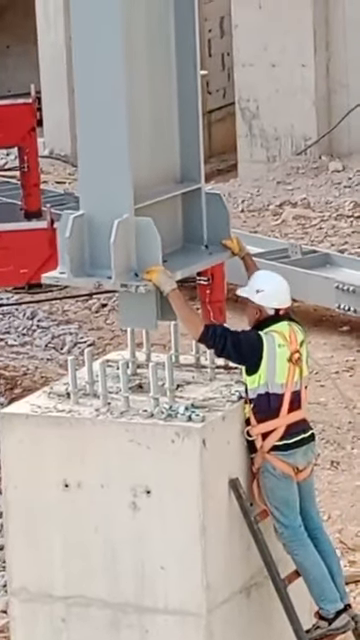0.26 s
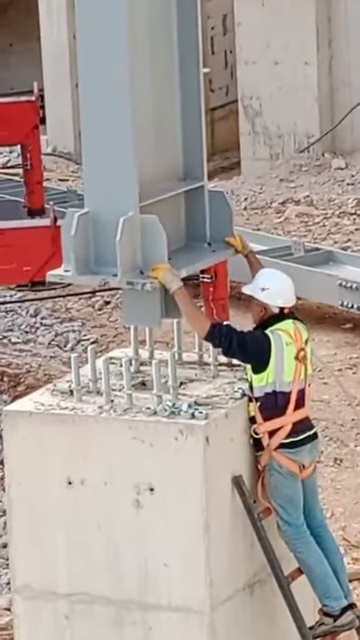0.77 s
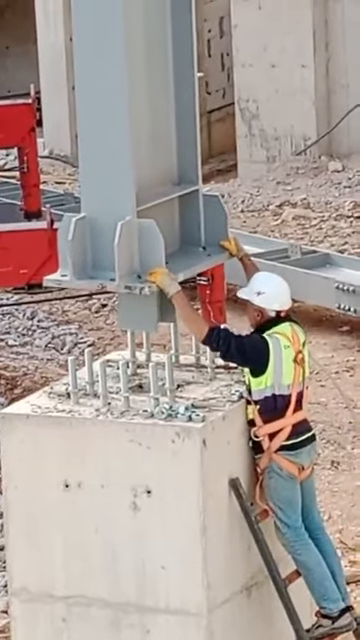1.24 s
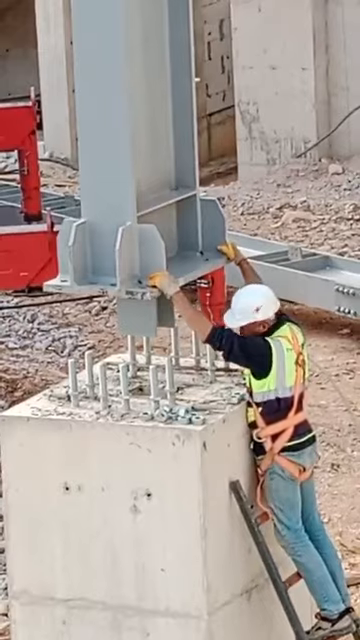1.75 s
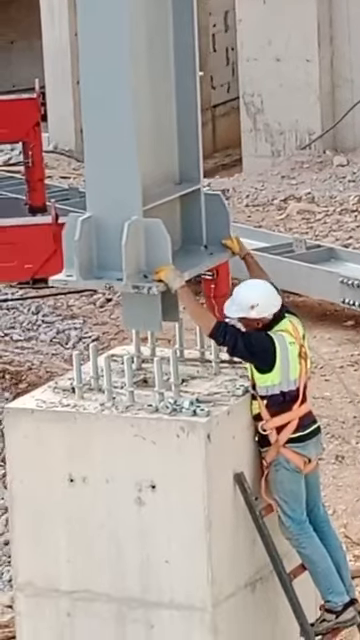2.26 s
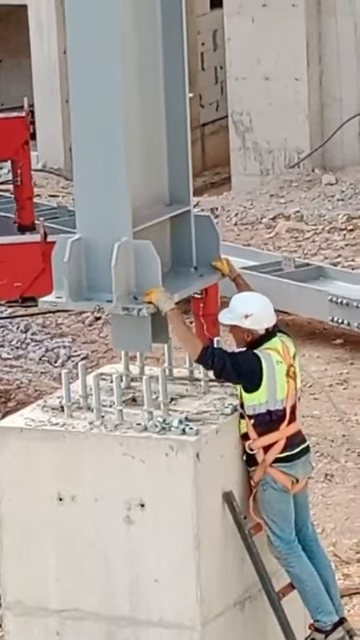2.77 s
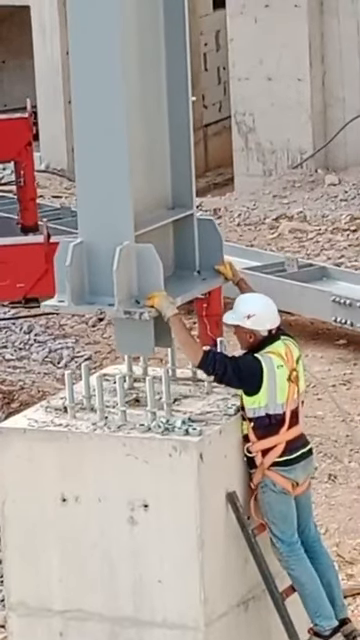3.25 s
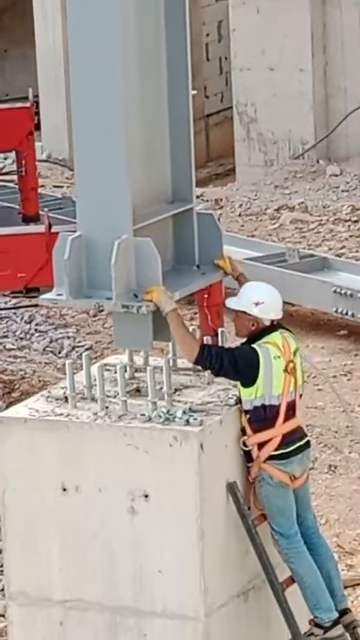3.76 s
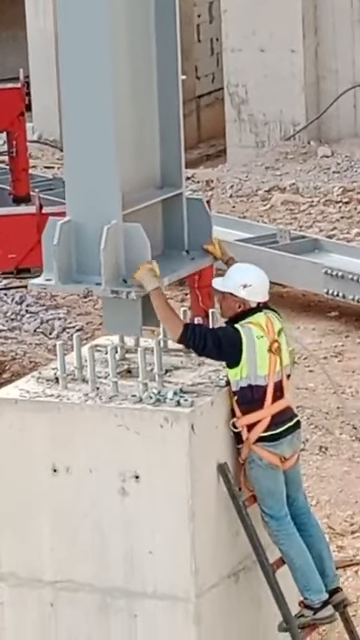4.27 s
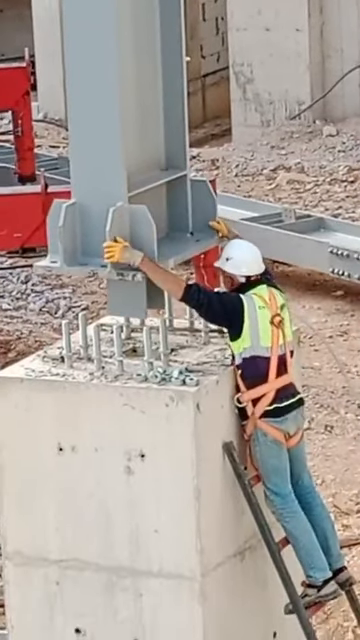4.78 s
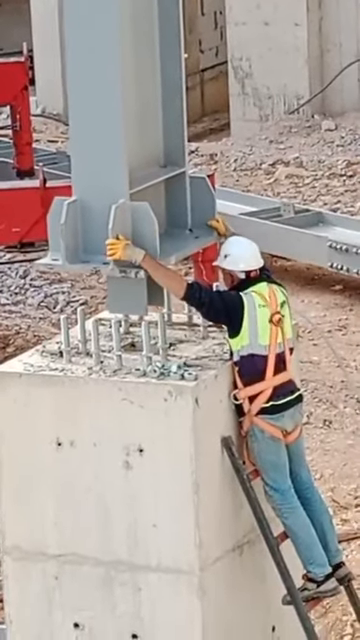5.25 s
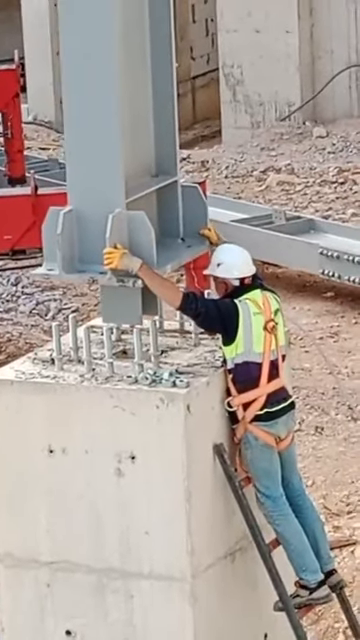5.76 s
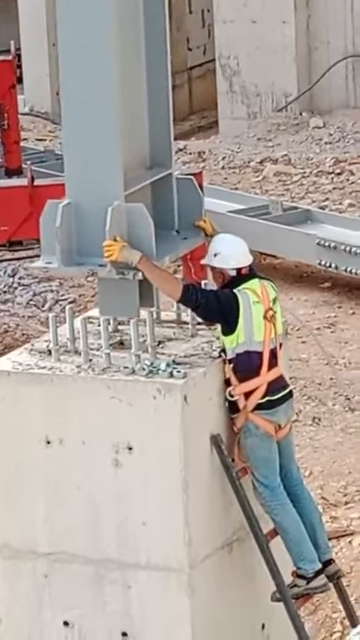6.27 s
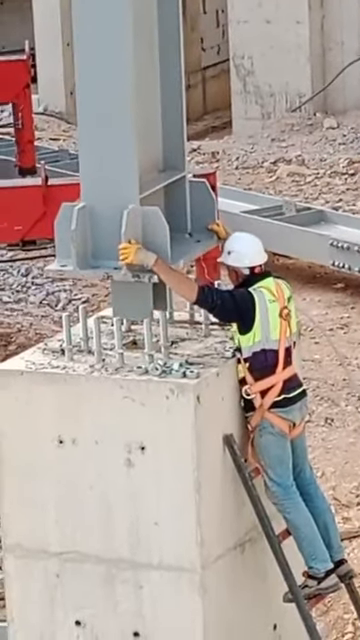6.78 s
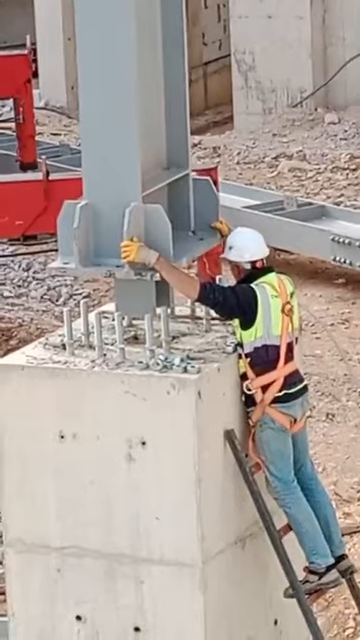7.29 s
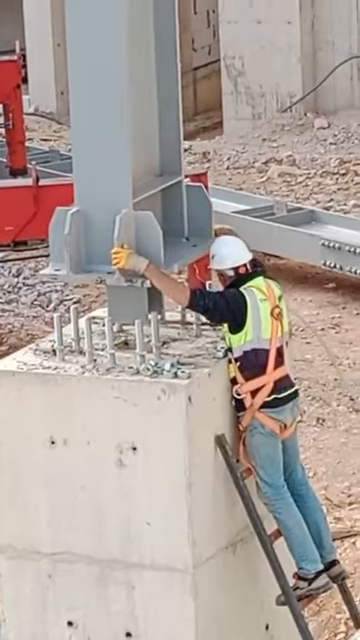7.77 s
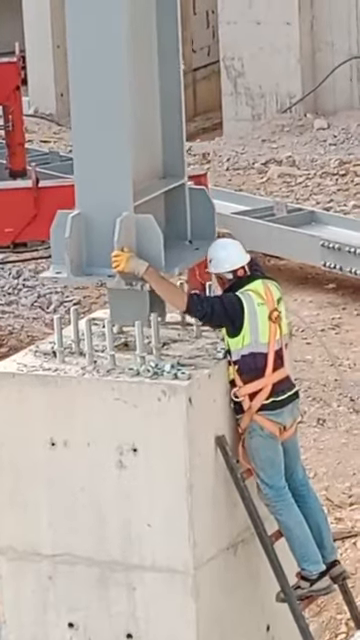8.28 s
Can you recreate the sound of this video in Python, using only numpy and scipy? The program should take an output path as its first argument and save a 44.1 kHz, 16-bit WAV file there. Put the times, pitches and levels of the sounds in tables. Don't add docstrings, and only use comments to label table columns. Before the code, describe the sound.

An outdoor building site heard through a distant phone microphone, mono, grainy and dull on top, with low wind buffeting. At 0 s a heavy diesel's drone falls in pitch, fading by 0.7 s into rough idling, broad machinery rumble and fan hiss. Dull knocks come near 0.85 and 1.45 s; at about 2.3 s steel clanks sharply, with smaller knocks until 3 s and short concrete echoes. At 3.1 s compressed air bursts out in a brief, fast-fading hiss. From 4.1 s the engine revs up rapidly, peaking around 4.8 s as a strong low growl with louder roar and hiss, loose parts rattling. A hydraulic moan swells around 5.2 s and fades before 7 s. The engine sags near 6 s, pulls again, with a knock at 6.4 s, dips around 7.2 s, recovers slightly, then drops away by 8.2 s with a last thud, leaving idle rumble until 8.5 s.

```python
import sys
import numpy as np
from scipy import signal
from scipy.fft import rfft, irfft, next_fast_len
from scipy.io import wavfile
from scipy.ndimage import uniform_filter1d

SR = 44100
rng = np.random.default_rng(int(sys.argv[2]) if len(sys.argv) > 2 else 0)


def persist_wave(psi):
    counts = np.round(np.clip(psi, -1, 1) * 32767).astype(np.int16)
    wavfile.write(sys.argv[1], SR, np.atleast_2d(counts).T)


def boost(x):
    u = np.asarray(x, float) / 20
    return 10 ** u


N = 376155
T = np.arange(N) / SR


def evened(x):
    return x / np.sqrt(np.mean(x ** 2) + 1e-20)


def columns(rows, outside=None):
    s, *values = np.transpose(rows)
    return [np.interp(T, s, v, outside, outside) for v in values]


def add(mix, s, sound):
    part = mix[round(s * SR):][:len(sound)]
    part += sound[:len(part)]


def white(n=N):
    return rng.standard_normal(n)


def coloured(x, points):
    size = next_fast_len(len(x))
    f, db = np.transpose(points)
    hz = np.fft.rfftfreq(size, 1 / SR)
    shape = boost(np.interp(np.log(hz + 1), np.log(f + 1), db, -120, -120))
    return evened(irfft(rfft(x, size) * shape, size)[:len(x)])


def patchy(patch_db, bins, frames):
    a, b, patches = rng.standard_normal((N // 128 + 5, 257, 3)).T
    patches = uniform_filter1d(patches, bins, 0)
    patches = evened(uniform_filter1d(patches, frames, 1))
    spectrum = (a + 1j * b) * boost(patch_db * patches)
    return signal.istft(spectrum, nperseg=512, noverlap=384)[1][:N]


def wander(rate_hz):
    low_pass = signal.butter(2, rate_hz, fs=SR / 32, output="sos")
    coarse = evened(signal.sosfilt(low_pass, white(N // 32 + 2)))
    return np.interp(np.arange(N) / 32, np.arange(len(coarse)), coarse)


def resonate(x, hz, width_hz):
    turn = np.exp(2j * np.pi * np.cumsum(hz * np.ones(len(x))) / SR)
    r = np.exp(-np.pi * width_hz / SR)
    once = signal.lfilter([1 - r], [1, -r], x / turn)
    twice = signal.lfilter([1 - r], [1, -r], once)
    return (turn * twice).real


# [t/s, firing rate f/Hz, exhaust load/dB, silencer's effect on second beat/dB]
COAST = [
    (0, 71.8, -41, -3),
    (.1, 67.06, -25.5, -3),
    (.25, 57.9, -32, -1),
    (.4, 56.8, -23.5, -3),
    (.56, 50.7, -33, 3),
    (.68, 52.6, -58, -1),
]
# [t/s, firing rate f/Hz, exhaust load/dB, silencer's effect on second beat/dB]
PULL = [(4.08, 40.25, -58, -1), (4.3, 50.34, -30.5, -4), (4.46, 61.2, -26, -7), (4.62, 65.04, -29, -11),
        (4.8, 67.25, -28.5, -5), (4.92, 67.1, -29.5, 5.5), (5.07, 66.93, -27, 5.5),
        (5.16, 66.33, -26, -7.5), (5.5, 64.16, -27.5, -2), (6.0, 56.44, -27.5, -1), (6.75, 58.33, -26, -4),
        (7.0, 58.64, -32, 1), (7.15, 59.1, -41, -1), (7.35, 62.3, -40.5, -4), (7.53, 59.06, -34.5, 4),
        (7.79, 54.73, -29.5, 1.5), (8.03, 54.2, -35.5, 3), (8.16, 49.7, -72, 1)]
# [multiple of firing rate, level/dB]
UPPER_BEATS = [(1.5, -7.5), (2.5, -8.5), (3, 4), (3.5, -9.5), (4, 6), (4.5, -5.5), (5, -0.5), (6, -7.5),
               (7, -2.5), (8, -10.5), (9, -7.5)]
# [f/Hz, gain/dB]
PIPE = [(30, 7.5), (170, -4.5), (200, -1.5), (240, -2), (268, 0.5), (300, -0.5), (335, 9.5), (400, -11.5),
        (470, -3), (600, -8.5)]


def exhaust(rows, first_beat_db, second_beat_db, upper_beats_db):
    on = (T > rows[0][0]) & (T < rows[-1][0])
    hz, load_db, hold_db = (curve[on] for curve in columns(rows))
    first_db = load_db + first_beat_db
    second_db = load_db + second_beat_db + hold_db
    upper_db = load_db + upper_beats_db + (1 - 0.51) * np.clip(-30 - load_db, 0, 14)
    phase = 2 * np.pi * np.cumsum(hz) / SR
    beats = boost(first_db + 1.1 * wander(18.0)[on]) * np.sin(phase)
    beats += boost(second_db + 1.7 * wander(1.6)[on]) * np.sin(2 * phase)
    for k, db in UPPER_BEATS:
        pipe_db = np.interp(k * hz, *np.transpose(PIPE))
        level = boost(upper_db + db + pipe_db + 0.33 * wander(3.6)[on])
        beats += level * np.sin(k * phase + 2 * np.pi * rng.random())
    out = np.zeros(N)
    onset_s = 0.0043
    out[on] = np.sqrt(2) * beats * np.clip(T[:len(hz)] / onset_s, 0, 1)
    return out


CYLINDERS = [0.5, -16, -19, 5.5, 2.5, 9]
# [t/s, effort/dB, fan air against effort/dB]
WORK = [(0.0, -29, -9.5), (0.52, -28.5, -11.5), (0.8, -29.5, -11), (1.04, -27.5, -16.5), (1.69, -29, -12),
        (2.18, -34, -9.5), (2.68, -29, -9.5), (2.8, -35, -12), (3.05, -34.5, -20), (3.3, -30.5, -11),
        (3.66, -32.5, -16.5), (4.0, -30, -14), (4.42, -23.5, -10.5), (4.77, -23, -11), (6.29, -27, -12),
        (6.75, -26, -12.5), (7.85, -27.5, -13.5), (8.3, -32.5, -12.5)]
# [t/s, share of its din in the middle sound/0-1]
BUSY = [(0, 0.64), (.8, 0.73), (1.05, 0.94), (1.7, 0.79), (2.1, 0.26), (2.7, 0.44), (3.5, 0.43),
        (3.75, 0.13), (4.05, 0.02), (4.6, 0.05), (5.5, 0), (6.3, 0.2), (7.0, 0.07), (7.9, 0.13),
        (8.53, 0.3)]
# [f/Hz, density/dB per Hz]
BOOM = [(90, -23), (150, 0), (204, 3.5), (281, 6), (320, 3.5), (400, 1.5), (450, -1.5), (520, -15.5),
        (700, -53.5)]
# [f/Hz, density/dB per Hz]
ROAR = [(400, -44), (520, -14.5), (640, -3), (740, 0.5), (830, 1.5), (947, 2), (1060, 3.5), (1300, 4),
        (1400, -1.5), (1480, -10.5), (1630, -5.5), (1800, -15.5), (2100, -34.5), (2700, -48)]
# [f/Hz, density/dB per Hz]
DIN = [(260, -35), (440, 0), (618, -3.5), (719, -3), (879, -9.5), (949, -2), (1110, -5.5), (1460, -10),
       (1600, -7), (1760, -11.5), (2300, -21), (2990, -47.5), (5060, -120)]
# [f/Hz, density/dB per Hz]
HISS = [(1120, -16.5), (1900, -2), (2080, -4), (2370, 2.5), (2860, 1.5), (3330, -6), (4410, -9),
        (4740, -14), (5400, -11), (5900, -21), (6600, -26.5), (8000, -45.5), (9500, -53), (15600, -56)]
IDLE_DB = -30
FAN_REST_DB = -44


def block():
    rate_hz = columns([row[:2] for row in COAST + PULL])[0]
    firings = np.cumsum(rate_hz) / SR
    strength = boost(np.array(CYLINDERS)[firings.astype(int) % len(CYLINDERS)])
    puff = strength * np.exp(-(firings % 1) / 0.11)
    valve = np.exp(-(firings % len(CYLINDERS)) / 1.5)
    effort_db, air_db = columns(WORK)
    share = np.clip(columns(BUSY)[0], 0, 1)
    boom_db = -33 + 5.5 * (np.sqrt(share) - .5)
    boom_db += 0.79 * (effort_db - IDLE_DB) + 1.25 * wander(3.0)
    jerks = boost(0.5 * wander(41.0))
    boom = coloured(patchy(3.3, bins=2, frames=12) * jerks, BOOM)
    roar = coloured(patchy(0.26, bins=2, frames=30) * (1 + 0.063 * puff) * jerks, ROAR)
    din = coloured(patchy(3.17, bins=3, frames=15) * jerks, DIN)
    hiss = coloured(patchy(1.5, bins=8, frames=20) * (1 + 0.25 * puff + 0.42 * valve), HISS)
    middle = np.sqrt(1 - share) * roar + np.sqrt(share) * din
    return boost(boom_db) * boom + boost(effort_db) * middle + boost(effort_db + air_db) * hiss


# [f/Hz, width/Hz, level against hiss/dB]
FIZZ = [(7910, 1100, -45), (12350, 600, -50), (14600, 800, -49.5)]


def fan_fizz():
    bands = sum(boost(db) * evened(resonate(white(), hz, width)) for hz, width, db in FIZZ)
    fan_db = sum(columns(WORK))
    return bands * boost(FAN_REST_DB + 0.6 * (fan_db - FAN_REST_DB) + 2.2 * wander(5.6))


# [t/s, f/Hz, depth/0-1]
DIP = [(0, 484, 0.45), (.25, 480, 0.8), (.55, 520, 0.34), (.8, 480, 0.84), (1.0, 520, 0), (1.6, 520, .1),
       (2.15, 520, 0.63), (2.6, 595, 0), (3.3, 650, 0.3), (3.53, 656, 0.9), (3.66, 573, 0.3),
       (3.83, 604, 0.46), (4.3, 520, 0.1), (5.5, 573, 0.13), (6.8, 472, 0.15), (7.25, 520, 0.53),
       (7.95, 488.5, 0.73), (8.5, 520, .6)]


def ground_dip(x):
    hz, depth = columns(DIP)
    return x - np.clip(depth, 0, 1) * 2 * resonate(x, hz, width_hz=340)


# [t/s, peak level/dB, ring f/Hz, rise/s, crack against peak/dB]
KNOCKS = [(0.854, -11, 256, 0.0036, -4), (0.887, -16, 229, 0.0028, -16), (1.454, -4.5, 825, 0.0015, -26.5),
          (1.8842, -21.5, 520, 0.003, 11.5), (2.2864, -2.5, 321, 0.005, -10),
          (2.4032, -6, 366, 0.0043, -25), (2.573, -5, 385, 0.0027, -23), (2.724, -11.5, 310, 0.00306, -16),
          (2.953, -17, 220, 0.0045, -16), (6.381, -8.5, 372, 0.0014, -23), (7.809, -12.5, 374, 0.0035, -26),
          (8.2605, -5.5, 195, 0.0028, -2.5)]
# [t/s, level/dB, length/s, top against level/dB, tilt/dB per octave]
TICKS = [(0.359, -28, 0.018, -59, -8), (0.854, -22.5, 0.025, -28.5, 4), (0.886, -27, 0.017, -50, 7),
         (0.97, -21.5, 0.16, -71, -7.5), (2.284, -22, 0.033, -38, -1), (2.4067, -23.5, 0.039, -18, 0),
         (2.417, -36, 0.027, -16, -4), (3.341, -30, .02, -54, 4), (3.874, -31.5, 0.0097, -57, -4),
         (3.805, -53, 0.153, -8, -1), (4.724, -22, 0.089, -44, -2.5), (5.302, -30.5, 0.037, -62, 6.5),
         (6.538, -24, 0.017, -31, 0.5), (7.285, -50.5, 0.46, -15.5, -2), (7.825, -34.5, 0.34, -33, -0.3)]
# [f/Hz, density/dB per Hz]
SNAP = [(900, -4), (1700, -0.5), (2300, -3), (3300, -2.5), (4500, -10), (6000, -14.5), (7000, -29.5)]
# [delay t/s, level/dB]
YARD = [(.012, -15), (.017, -14.5), (0.033, -11), (.047, -14.5), (0.082, -17.5)]


def steel():
    out, direct, t = np.zeros(N), np.zeros(N), T[:8000]
    for s, db, hz, rise, crack_db in KNOCKS:
        t60 = 0.034 * (300 / hz) ** 1.7
        swell = np.sin(np.pi / 2 * np.clip(t / rise, 0, 1)) ** 2
        swell *= boost(-60 * np.maximum(t - rise, 0) / t60)
        phase = 2 * np.pi * hz * (t - rise)
        ring = swell * (np.cos(phase) + 0.28 * np.cos(0.62 * phase))
        dent = -np.exp(-((t - .0012) / 0.00068) ** 2) * np.cos(2 * np.pi * 700 * (t - .0012))
        add(out, s, boost(db) * (ring / abs(ring).max() + boost(crack_db) * dent))
    for s, db, length, top_db, tilt_db in TICKS:
        tilted = [(hz, at_db + tilt_db * np.log2(hz / 2000)) for hz, at_db in SNAP]
        low = coloured(white(len(t)), tilted)
        top = coloured(white(len(t)), [(7400, -13.0), (9000, -13.5), (12300, -3.5), (14500, 0.0), (15500, -5.5)])
        start = np.sin(np.pi / 2 * np.clip(t / (0.0005 + 0.06 * length), 0, 1)) ** 2
        fade = start * boost(db - 60 * t / max(length, .004))
        add(out, s, fade * low)
        add(direct, s, fade * boost(top_db) * top)
    echoes = np.zeros(SR // 8)
    echoes[0] = 1
    for delay, db in YARD:
        echoes[round(delay * SR)] = boost(db)
    thin = signal.sosfilt(signal.butter(2, 110, "high", fs=SR, output="sos"), out)
    return signal.oaconvolve(thin, echoes)[:N] + direct


# [f/Hz, density/dB per Hz]
JET = [(900, -19), (1500, 1), (1900, -7), (2900, 0), (3320, -8.5), (4000, -5), (5630, -3), (6400, -8.5),
       (6900, -32.5), (8000, -20), (9500, -29), (12000, -13.5), (13200, -18), (15500, -29)]


def air_valve():
    opens_s, leaks_s, opens_db_per_s = 3.103, 3.045, 898
    since = T - opens_s
    leak_db = -26 + np.minimum(opens_db_per_s * (T - leaks_s), 0)
    opening_db = np.maximum(opens_db_per_s * since, leak_db)
    draining_db = np.maximum(-68 * since, -10 - 38 * since)
    level_db = -31 + np.minimum(opening_db, draining_db)
    jet = coloured(patchy(3.2, bins=1, frames=30), JET)
    low = signal.sosfiltfilt(signal.butter(4, 6900, fs=SR, output="sos"), jet)
    top_db = -5.0 - 66 * np.maximum(since, 0)
    return boost(level_db) * (low + boost(top_db) * (jet - low))


# [t/s, peak level/dB, ring f/Hz]
BUMPS = [(0.382, -24, 120.2), (.678, -18, 242), (2.669, -17, 296), (2.819, -11, 171.6), (2.856, -14, 150),
         (3.018, -10, 150), (3.092, -14, 120), (3.639, -20, 246), (4.873, -14.5, 131.7), (5.612, -11, 274),
         (0.944, -12, 256), (0.993, -9, 261), (1.503, -12, 136.7), (1.642, -13, 247), (1.76, -22, 229),
         (2.122, -12, 292), (2.319, -26, 339), (3.204, -21, 245), (3.396, -16, 283), (3.542, -16, 143),
         (3.908, -21, 293), (4.073, -26, 296), (4.329, -9.5, 188), (4.606, -6, 288), (5.415, -6, 288),
         (6.217, -7, 240), (6.28, -9, 227.9), (6.693, -5.5, 256.3), (7.008, -11, 128), (7.32, -6, 237),
         (8.111, -9.5, 258), (8.334, -8.5, 353), (8.368, -18, 353), (8.412, -8.5, 235)]
# [t/s, peak level/dB, ring f/Hz]
CLACKS = [(.416, -26, 595), (.523, -20, 509), (0.537, -13, 1120), (.956, -13, 517), (1.043, -14, 460),
          (5.512, -16, 511), (6.193, -17, 673), (7.749, -16, 616), (1.093, -15, 886), (2.72, -20, 760),
          (2.81, -20, 684), (3.198, -15, 890), (3.849, -22, 1050), (3.8735, -19, 1160), (4.16, -10.5, 1290),
          (4.291, -12, 853), (4.398, -17, 1190), (4.629, -14, 1190), (4.709, -17, 834), (4.831, -11, 966),
          (5.153, -18, 1030), (5.317, -9, 1110), (5.407, -18, 1220), (6.008, -13, 1100), (6.573, -13, 1060),
          (6.74, -10, 1010), (6.947, -14, 789), (7.279, -21, 1090), (7.378, -28, 985), (7.613, -21, 705)]
# [t/s, peak level/dB, ring f/Hz]
CHINKS = [(0.3949, -22, 1620), (0.4378, -14, 1580), (1.0114, -26, 1650), (3.2044, -31, 1600),
          (3.8494, -32, 1600), (5.0423, -24, 1600), (5.2973, -15, 2510), (5.405, -21, 1750),
          (6.6442, -23, 1610), (7.385, -26, 1594)]


def jolts():
    out, t = np.zeros(N), T[:4000]
    # table, cycles until 60 dB down, trim/dB
    for rows, cycles, trim_db in ((BUMPS, 8.6, -7), (CLACKS, 26, -5), (CHINKS, 19, -6.5)):
        for s, db, hz in rows:
            swell = np.sin(np.pi / 2 * np.clip(t * hz, 0, 1)) ** 2
            swell *= boost(-60 * np.maximum(t * hz - 1, 0) / cycles)
            add(out, s, boost(db + trim_db) * swell * np.cos(2 * np.pi * hz * t))
    return out


# [t/s, length/s,
# from f/Hz, to f/Hz, level/dB]
RINGS = [(0.51, 0.24, 202, 254, -27), (0.549, 0.21, 440, 421, -38), (0.99, 0.81, 1640, 1600, -42.5),
         (4.7, 0.41, 830, 812, -31.5), (1.9, 0.17, 820, 635, -34), (1.67, 0.058, 1070, 1130, -31.5),
         (2.56, 0.23, 480, 530, -38), (3.13, 0.089, 3500, 3100, -45), (0.97, 0.11, 285, 280, -24.5),
         (1.747, 0.064, 676, 630, -40), (3.31, 0.12, 533, 540, -35), (3.56, 0.081, 240, 245, -27),
         (7.847, 0.056, 950, 970, -32), (7.78, .04, 1014, 1010, -27), (8.052, 0.04, 1220, 1300, -31),
         (8.07, 0.088, 670, 630, -33.5), (7.057, 0.25, 256, 220, -31), (8.309, 0.15, 350, 340, -30),
         (8.361, 0.14, 243.7, 250, -29)]
# [f/Hz, level/dB, t60/s]
COLUMN = [(1020, 16, 0.018), (1726, 12.5, 0.018), (2800, 0.5, 0.025), (3550, 2, 0.015)]


def rings():
    out = np.zeros(N)
    for s, length, from_hz, to_hz, db in RINGS:
        done = T[:round(length * SR)] / length
        hz = from_hz + (to_hz - from_hz) * done
        width_hz = 22 + 8 * (from_hz / 1000) ** 2
        tone = evened(resonate(white(len(hz)), hz, width_hz))
        add(out, s, boost(db) * np.sin(np.pi * done) * tone)
    t = T[:2000]
    clang = sum(boost(db - 60 * t / t60) * np.sin(2 * np.pi * hz * t) for hz, db, t60 in COLUMN)
    clang_s, clang_db = 2.2866, -23
    add(out, clang_s, boost(clang_db) * clang * (1 - np.exp(-(t / 0.00097) ** 2)))
    return out


# [f/Hz, width/Hz, level/dB]
HUMS = [(293.4, 2.6, -39.5), (395, 4.6, -47.5), (811.7, 40, -43), (650, 16, -46)]
# [t/s, f/Hz, level/dB]
PUMP = [
    (4.6, 259.6, -63),
    (5.0, 250, -44),
    (5.2, 247.6, -29.5),
    (5.45, 260, -34.5),
    (5.9, 255, -35.5),
    (6.4, 256, -38),
    (6.9, 243, -78),
]


def far_machine():
    hums = sum(boost(db) * evened(resonate(white(), hz, width)) for hz, width, db in HUMS)
    moan = evened(resonate(white(), columns(PUMP)[0], width_hz=17.0))
    return hums + boost(columns(PUMP, -120)[1]) * moan


def puffs(rows):
    t = T[::32]
    power = 0
    for s, db, fall in rows:
        away = np.maximum(t - s, (s - t) / 0.77)
        power = power + boost(db - 20 * away / fall) ** 2
    return np.interp(T, t, np.sqrt(power))


# [t/s, level/dB, fall/s]
GUSTS = [(0.0, -18.5, 0.13), (.12, -30.5, 0.37), (.4, -25.5, 0.39), (.6, -31, 0.78), (.85, -25, 0.15),
         (1.02, -19, 0.034), (1.19, -21.5, 0.042), (1.42, -23.5, 0.05), (1.59, -20, 0.16),
         (1.8, -30.5, 0.39), (2.18, -36, 0.038), (2.29, -27.5, 0.46), (2.83, -24.5, 0.14),
         (2.97, -23, 0.13), (3.08, -24.5, 0.09), (3.28, -28.5, 0.071), (3.43, -29, 0.055),
         (3.54, -24, 0.12), (3.94, -44, 0.063), (4.16, -24, 0.12), (4.82, -30, 0.087), (5.13, -29.5, 0.14),
         (5.53, -28, 0.17), (6.13, -23.5, 0.25), (6.41, -22.5, 0.54), (6.91, -24.5, 0.18),
         (7.53, -24, 0.22), (8.1, -30, 0.27), (8.43, -33, 0.15)]
# [t/s, level/dB, fall/s]
THUDS = [(0.0, -14, 0.015), (.52, -33.5, 0.22), (.9, -32, 0.48), (1.51, -29, 0.35), (1.75, -34.5, 0.28),
         (1.93, -28.5, 0.074), (2.15, -43, 0.2), (2.43, -27, 0.037), (2.69, -50, 0.067), (2.84, -44, 0.083),
         (2.98, -29, 0.5), (3.27, -29.5, 0.075), (3.42, -31.5, 0.16), (3.64, -31, 0.2), (3.84, -36, 0.051),
         (3.96, -35, 0.082), (4.1, -44, 0.11)]
# [f/Hz, density/dB per Hz]
BUFFET = [(60, -42), (80, -5.5), (100, 0), (227, -3.5), (298, -9.5), (400, -12), (470, -39.5), (600, -71.5)]
# [f/Hz, density/dB per Hz]
DEEP = [(30, -38), (50, -15), (65, -5.5), (85, -1.5), (100, -5.5), (130, -34.5)]
# [f/Hz, density/dB per Hz]
GROUND = [(10, -4.5), (25, 0.5), (60, -6), (90, -25)]


def wind():
    lumps = coloured(white() * boost(2.0 * wander(21.0)), BUFFET)
    thuds = coloured(white() * boost(2.2 * wander(8.9)), DEEP)
    rumble = coloured(white(), GROUND)
    shake = boost(columns(PULL)[1] - 2.5)
    lull = boost(-50)
    stir = np.sqrt(puffs(GUSTS) ** 2 + shake ** 2 + lull ** 2)
    return stir * lumps + puffs(THUDS) * thuds + boost(-59.5) * rumble


# [f/Hz, density/dB per Hz]
HAZE = [(2500, -19), (3500, -6), (4500, 6), (5600, 1), (5900, -18)]


def haze():
    fan_db = sum(columns(WORK))
    return boost(-66 + 0.3 * (fan_db - FAN_REST_DB)) * coloured(white(), HAZE)


def scene():
    diesel = exhaust(COAST, first_beat_db=-37, second_beat_db=0.3, upper_beats_db=-12.5)
    diesel += exhaust(PULL, first_beat_db=0.3, second_beat_db=-3.5, upper_beats_db=-10.5)
    diesel = ground_dip(diesel + block())
    near = diesel + fan_fizz() + steel() + air_valve() + jolts() + rings()
    return (near + far_machine() + wind() + haze())[None]


def top_cut(x):
    return signal.sosfilt(signal.butter(12, 15720, fs=SR, output="sos"), x)


# [f/Hz, limit level/dB, cut/dB]
THIN = [(400, -75, -3), (520, -65, -7), (641.6, -82, 5), (2010, -70, -17), (4040, -80, -7),
        (5230, -87.5, -9.5), (5740, -81.5, -16.5), (5900, -77, -44), (5900, -71, -47), (6580, -84, -40),
        (7100, -90.5, -30.5), (7100, -92.5, -14.5), (8800, -100, -10.5), (16000, -103, -9.5)]
# [from f/Hz, to f/Hz]
GAPS = [(6950, 7300), (13250, 14150), (15550, 22050)]


def record(dry):
    frame = dict(nperseg=2048, noverlap=1024, window="cosine")
    hz, _, z = signal.stft(dry[0], SR, **frame)
    band_hz = hz[:1024, None]
    below_top = band_hz < 5800
    power = abs(z[:1024]) ** 2
    bands_db = 10 * np.log10(power.reshape(128, 8, -1).mean(1).repeat(8, 0) + 1e-20)
    wide_db = uniform_filter1d(bands_db.reshape(64, 16, -1).mean(1), size=3, axis=1)
    fickle = evened(uniform_filter1d(rng.standard_normal(wide_db.T.shape), size=5, axis=0)).T
    fickle[21:] = 0
    wide_db = (wide_db + 3.5 * fickle).repeat(16, axis=0)
    bands_db = np.where(below_top, bands_db, wide_db)
    at_hz, limit_db, cut_db = np.transpose(THIN)
    drift_db = uniform_filter1d(bands_db, size=9, axis=1) - bands_db.mean(1, keepdims=True)
    limit_db = np.interp(band_hz, at_hz, limit_db) + 0.096 * drift_db * below_top
    z[:1024] *= np.where(bands_db < limit_db, boost(np.interp(band_hz, at_hz, cut_db)), 1)
    power = abs(z) ** 2
    around = uniform_filter1d(power, size=9, axis=0)
    z *= (power / (around + 1e-20) + 1e-6) ** (0.057 / 2)
    for low_hz, high_hz in GAPS:
        z[(hz > low_hz) & (hz < high_hz)] *= boost(-21.0)
    thinned = signal.istft(z, SR, **frame)[1][None, :N]
    return top_cut(thinned * np.minimum(T / 0.00077, 1))


dry = scene()
out = record(dry)
persist_wave(out)
```